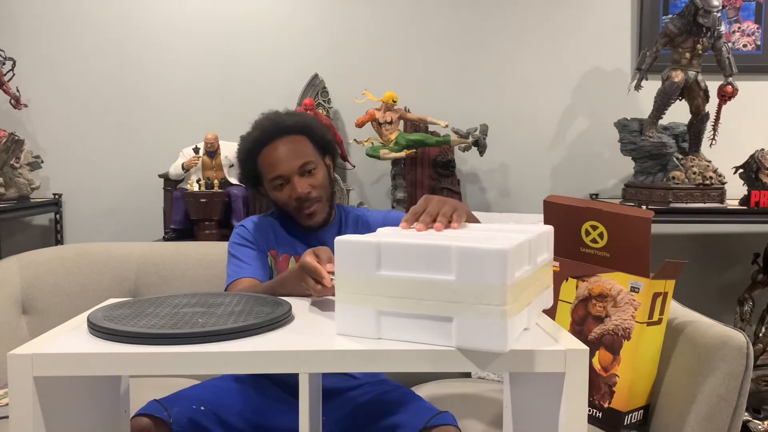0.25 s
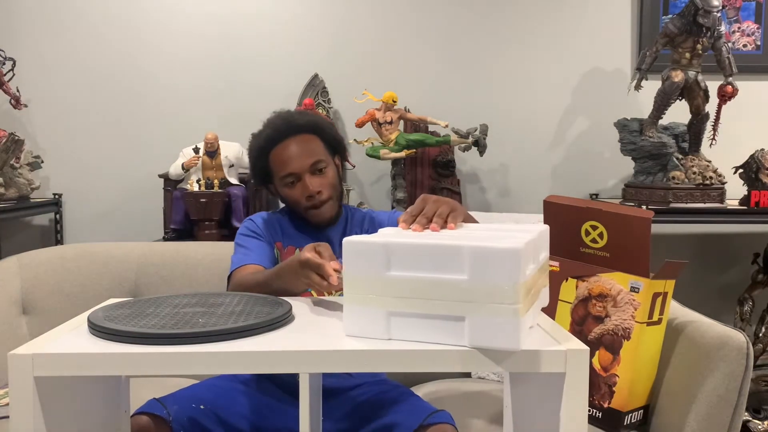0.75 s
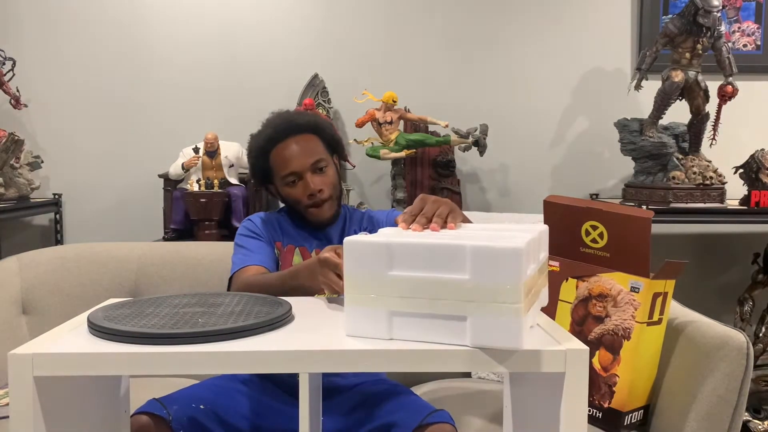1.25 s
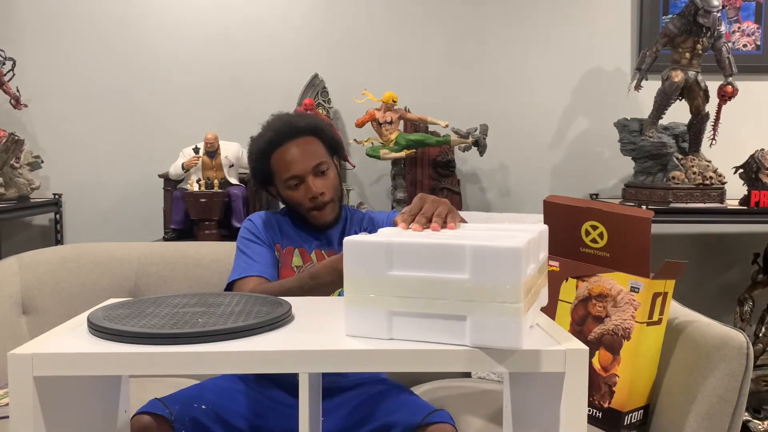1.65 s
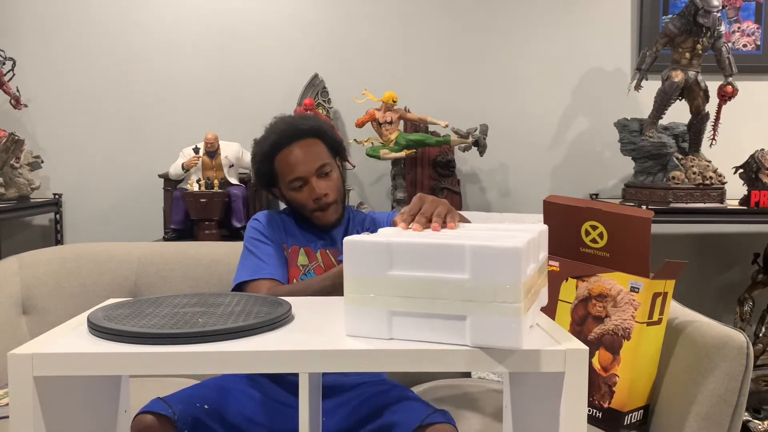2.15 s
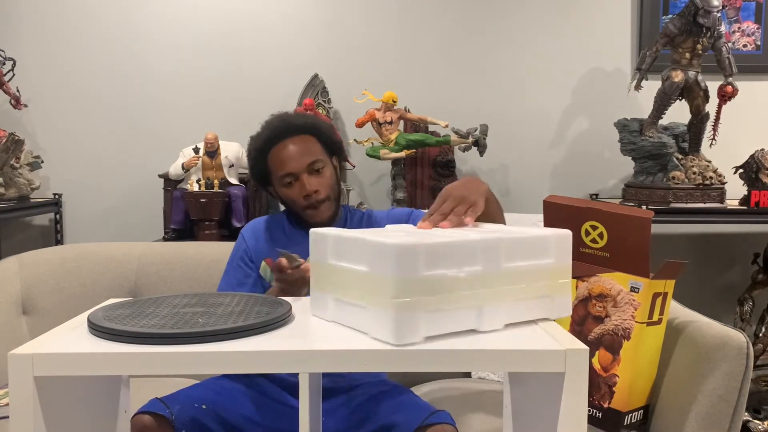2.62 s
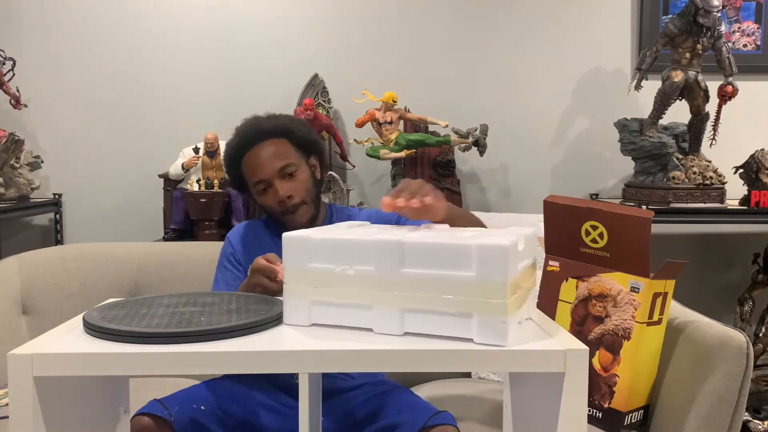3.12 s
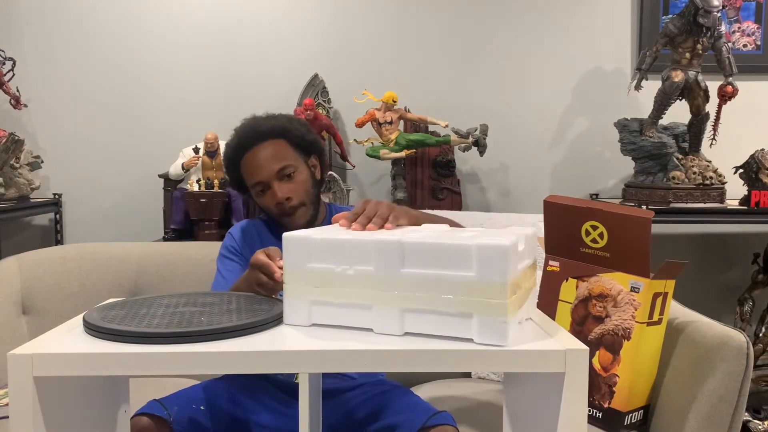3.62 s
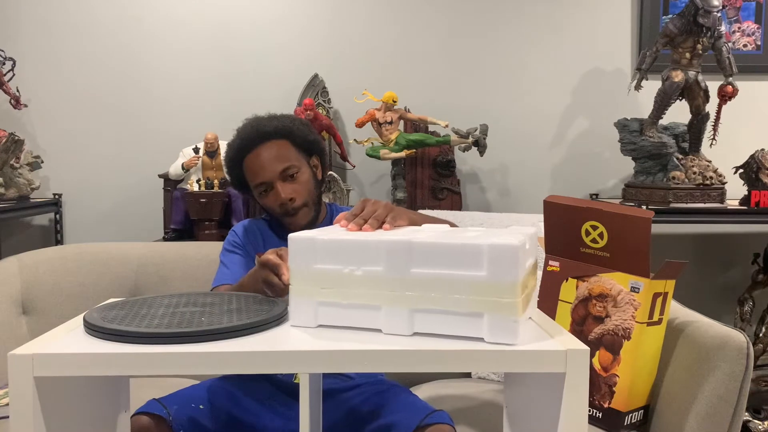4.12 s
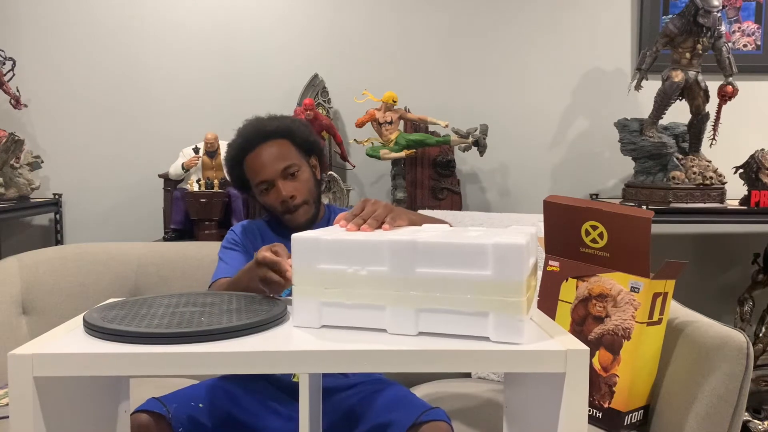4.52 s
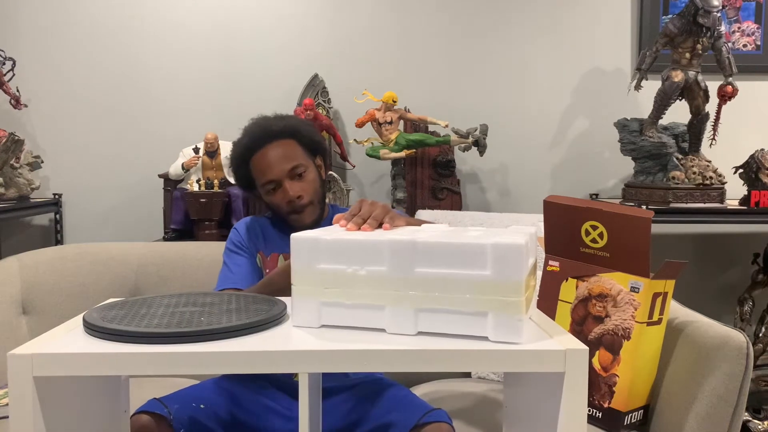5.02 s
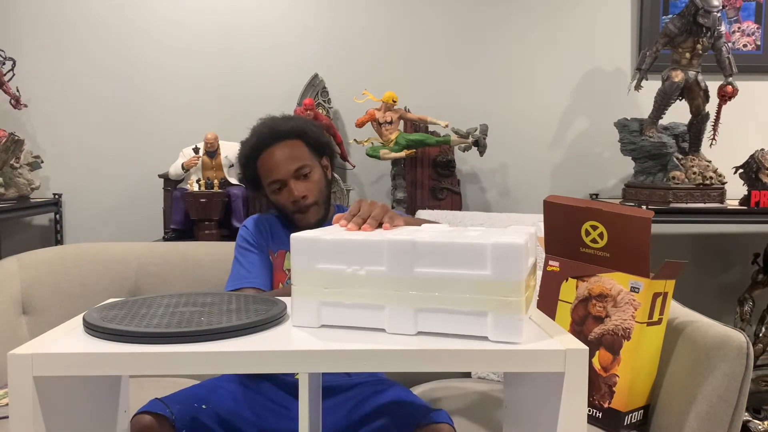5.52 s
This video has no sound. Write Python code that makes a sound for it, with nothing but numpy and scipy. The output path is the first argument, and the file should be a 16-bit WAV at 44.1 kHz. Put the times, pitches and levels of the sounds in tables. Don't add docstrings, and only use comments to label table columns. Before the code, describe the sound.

Close up in a small furnished room, a blade and hands work a polystyrene case's taped seam. Dry grainy rubbing, snaps and a short hard rip with a lid knock come first; the case is turned and drops on a hollow table, then a near pause. Faint tape creaks and ticks lead to a softer rip, then busy scraping and knocks that fade. Low ventilation rumble, phone microphone at arm's length.

```python
import sys
import numpy as np
from scipy import signal
from scipy.fft import rfft, irfft, next_fast_len
from scipy.io import wavfile
from scipy.ndimage import uniform_filter1d, minimum_filter1d

SR = 44100
rng = np.random.default_rng(int(sys.argv[2]) if len(sys.argv) > 2 else 0)


def undo_db(level):
    steps = np.asarray(level, float) / 20
    return 10 ** steps


def bounce(signal):
    frames = np.transpose(np.atleast_2d(signal))
    limited = np.clip(frames, -1, 1)
    pcm = np.round(limited * 32767).astype(np.int16)
    wavfile.write(sys.argv[1], SR, pcm)


N = 254310
HZ = np.fft.rfftfreq(next_fast_len(N + SR), 1 / SR)


def shape(x, response):
    size = 2 * len(HZ) - 2
    return irfft(rfft(x, size) * response, size)[..., :N]


def notch(lo_hz, hi_hz):
    return np.clip(np.maximum(lo_hz - HZ, HZ - hi_hz) / 150 + 1, 0, 1) ** 2


def ring(modes):
    f = HZ + 1e-6
    total = 0
    for k, (hz, width_hz, db) in enumerate(modes):
        total = total + (-1) ** k * undo_db(db) / (1 + 1j * (f / hz - hz / f) * hz / width_hz)
    return total / np.sqrt(np.mean(np.abs(total) ** 2))


def walk(rate):
    hold = int(SR / rate)
    steps = np.repeat(rng.standard_normal(N // hold + 1), hold)
    return 1.1 * uniform_filter1d(uniform_filter1d(steps, hold), hold)[:N]


def add(track, s, piece):
    i = int(s * SR)
    track[..., i:i + piece.shape[-1]] += piece[..., :N - i]


def impulses(events):
    track = np.zeros(N)
    for s, db in events:
        add(track, s, undo_db(np.array([db])))
    return track


def strokes(moves, rise_db_s, fall_db_s):
    t = np.arange(0, N, 32) / SR
    power = np.zeros((2, 1)) + undo_db(2 * -92.5)
    for s, hold_s, db, colour_db in moves:
        env_db = db - rise_db_s * np.maximum(s - t, 0) - fall_db_s * np.maximum(t - s - hold_s, 0)
        power = power + undo_db(2 * (env_db + np.array([[0], [colour_db]])))
    return np.repeat(np.sqrt(power), 32, axis=1)[:, :N]


def push(scrape_db, table_db, wall_db, hiss_db):
    return undo_db(np.array([[table_db + 27.0], [wall_db + 17.0], [scrape_db + 12.0], [hiss_db + 21.5]]))


def air():
    # (frequency [Hz], level per Hz [dB])
    rumble = [(18, -65.5), (30, -33.5), (42, -14), (59, 2.5), (81, 0), (98, -12), (153, -9), (215, -16.5),
              (280, -33), (311, -16), (1070, -65), (2610, -48), (16000, -92.5)]
    # (frequency [Hz], level [dB])
    hum = [(70.0, -63.5), (118.4, -61.5), (161.5, -83.5)]
    hz, db = np.transpose(rumble)
    spectrum = undo_db(np.interp(np.log(HZ + 1), np.log(hz), db))
    mid, side = shape(rng.standard_normal((2, N)), spectrum)
    side = shape(side, np.clip(HZ / 700, .2, 1))
    gusts = undo_db(-50.5 + 0.5 * walk(7.0))
    wind = gusts * (mid + side * np.array([[1], [-1]])) / mid.std()
    t = np.arange(N) / SR
    lines = sum(undo_db(db + 1.9 * walk(2.3)) * np.sin(2 * np.pi * f * t + 2.2 * walk(1.7)) for f, db in hum)
    return wind + lines


def room():
    # (frequency [Hz], time to fall 60 dB [s])
    decay = [(150, 0.26), (500, 0.35), (1500, 0.3), (4000, 0.38), (9000, 0.29), (15000, 0.22)]
    # (delay [ms], level [dB], scatter [ms])
    surfaces = [(2.6, -17, .4), (5.0, -11, .15), (11.5, -12, 1.2), (14, -14, 2)]
    t = np.arange(SR // 2) / SR
    f = np.fft.rfftfreq(len(t), 1 / SR)
    noise = rfft(rng.standard_normal((2, len(t))))
    noise = noise / (1 + (350 / (f + 1)) ** 2)
    alike = np.clip(350 / (f + 1), 0, 1)
    noise[1] = alike * noise[0] + np.sqrt(1 - alike ** 2) * noise[1]
    centres = np.log([hz for hz, _ in decay])
    tail = 0
    for k, (hz, t60) in enumerate(decay):
        share = np.interp(np.log(f + 1), centres, np.arange(len(decay)) == k)
        tail = tail + irfft(noise * share) * np.exp(-np.log(1000) * t / t60)
    tail = tail * np.clip(t / 0.0026, 0, 1)
    response = undo_db(-0.5) * tail / np.sqrt(np.sum(tail[0] ** 2))
    for (ms, db, scatter_ms), echo in zip(surfaces, rng.standard_normal((len(surfaces), 2, 256))):
        echo = (echo + 1.5 * echo[0]) * np.exp(-1000 * t[:256] / scatter_ms)
        echo = echo / np.sqrt(np.sum(echo ** 2, axis=1, keepdims=True))
        add(response, ms / 1000, undo_db(db) * echo)
    response = rfft(response, 2 * len(HZ) - 2)
    power = np.abs(response) ** 2
    return response * np.sqrt(uniform_filter1d(power, size=6000) / (uniform_filter1d(power, size=800) + 1e-9))


def bumps():
    # (time [s], level [dB])
    thuds = [
        (.025, -80),
        (1.73, -42),
        (2.305, -61),
        (2.696, -39),
        (2.774, -24.5),
        (2.984, -44),
        (3.214, -44),
        (3.69, -41),
        (4.327, -28),
    ]
    # (frequency [Hz], width [Hz], level [dB])
    top = [(151, 35, -13), (203, 43, -10.5)]
    return shape(impulses(thuds), undo_db(30.0) * ring(top) / (1 + 1j * HZ / 300) ** 2)


def raps():
    # (time [s], level [dB])
    hits = [(.0265, -55), (2.769, -37), (2.777, -47), (2.8, -45), (3.191, -63), (3.288, -47.5),
            (4.045, -44), (4.65, -26), (4.811, -22), (4.822, -26), (4.878, -22), (4.889, -21.5),
            (4.963, -26.5), (5.04, -36), (5.13, -31)]
    # (frequency [Hz], width [Hz], level [dB])
    side_wall = [(1280, 190, -3), (1560, 310, 2), (2000, 370, 0), (2650, 510, 0.5)]
    return shape(undo_db(16.5) * impulses(hits), ring(side_wall))


def knocks():
    # (time [s], level [dB])
    hits = [
        (0.808, -39),
        (1.078, -18),
        (1.089, -22),
        (1.123, -37),
        (4.014, -49),
        (4.043, -38),
        (4.342, -19),
        (4.675, -30),
        (4.69, -29),
    ]
    # (frequency [Hz], width [Hz], level [dB])
    lid = [(1031.5, 130, 7.5), (1250, 28, -8)]
    return shape(undo_db(18.5) * impulses(hits), ring(lid))


def threads():
    # (time [s], level [dB])
    ticks = [(3.1946, -57), (3.5964, -50), (3.607, -49.5), (3.6656, -54), (3.6998, -49), (3.73, -48.5),
             (3.781, -46), (3.7944, -61), (3.823, -60), (3.833, -51), (3.8786, -54.5), (3.9024, -58.5),
             (3.926, -50), (4.167, -42.5), (5.6905, -69)]
    # (frequency [Hz], width [Hz], level [dB])
    thread = [(1204, 1200, -16), (6320, 470, 3.5), (10700, 1140, -1.5), (14500, 2200, -6)]
    return shape(impulses(ticks), undo_db(23.5) * ring(thread))


def creak():
    # (frequency [Hz], width [Hz], level [dB])
    taut = [(6400, 650, 11), (12520, 3000, -10)]
    start_s, end_s, gap_s = 3.461, 3.59, .0115
    s = np.arange(start_s, end_s, gap_s)
    chance = rng.standard_normal((len(s), 2))
    ticks = zip(s + .001 * chance[:, 0], -61 + 2 * chance[:, 1])
    return shape(impulses(ticks), undo_db(21.0) * ring(taut))


def snaps(slip_db=-3.0, slip_ms=.45):
    # (time [s], level [dB], brightness [dB], share that rings the foam walls [dB])
    releases = [(0.4958, -45.5, 1.5, -17), (0.6022, -47, 1.5, 11), (0.8081, -30.5, 3, 5),
                (0.852, -30, 2.5, 6.5), (0.8811, -16.5, 1.5, -13.5), (1.0774, -35.5, 9.5, 9),
                (1.0899, -17, -28, -20), (1.1228, -18, -3.5, -24), (1.1331, -35, -11.5, 14.5),
                (1.1793, -15, -11.5, -10), (1.73, -21.5, 1, -7), (1.8113, -18.5, -0.9, -8),
                (2.3051, -59, -3.2, 6), (2.7674, -45, -4.5, -3), (2.7764, -39, -22, 8),
                (4.0127, -45, -14, 12), (4.0418, -32, -14, -3), (4.3277, -18, 5.5, -25),
                (4.3325, -38, 2.5, 12), (4.3447, -23, 10.5, -15), (4.4356, -41, 5, 5.5),
                (4.5246, -31.5, -6, -1.5), (4.647, -26.5, -3, 3), (4.809, -19.5, -7.5, -5.5),
                (4.821, -25, -9.5, -3), (4.8758, -15, -2.5, -8), (4.962, -20, -32, -9), (5.128, -33, -4, 4),
                (2.38, -40, -17, -14)]
    drive, t = np.zeros((4, N)), np.arange(256) / SR
    for s, db, bright_db, wall_db in releases:
        slip = rng.standard_normal(256) * np.exp(-1000 * t / slip_ms)
        slip = undo_db(slip_db) * slip / np.sqrt(np.sum(slip ** 2))
        slip[0] = 1
        add(drive, s, push(db, db - 41, db + wall_db, db + bright_db) * slip)
    return drive


def rips(rough_db=-0.5):
    # (time [s], level [dB], rise [ms], fall [ms])
    tears = [
        (0.8804, -4, 2.9, 2.2),
        (4.3279, -11, 7.2, 17.4),
    ]
    drive, ms = np.zeros((4, N)), 1000 * np.arange(N) / SR
    for s, db, rise_ms, fall_ms in tears:
        late = ms - 1000 * s
        gather = 0.2 * np.exp(np.minimum(late, 0) / rise_ms)
        die = np.exp(-np.maximum(late, 0) / fall_ms)
        envelope = np.where(late < 0, gather, die)
        rough = np.repeat(rng.standard_normal(N // 32 + 1), 32)[:N]
        crackle = rng.standard_normal((4, N)) * undo_db(rough_db * rough)
        bright = np.array([[1], [1], [1], [.3]]) ** (late < 0)
        force = push(db, db - 26.5, db - 11, db - 26)
        drive = drive + undo_db(-14.5) * force * bright * envelope * crackle
    return drive


def rub(scatter_db=4.0, flutter_db=1.99):
    # (start [s], hold [s], level [dB], brightness [dB])
    blade = [(0, 0.02, -68, -0.5), (.26, 0.23, -57, -16), (.44, 0.009, -48.5, 2), (.62, 0.023, -47.5, -9.5),
             (.85, 0.024, -38.5, -17), (.92, .02, -61, 3), (1.0, 0.089, -52, -21), (1.095, .02, -44.5, 2),
             (1.2, 0.51, -42.5, 0), (1.76, 0.071, -41.5, -6), (1.92, .07, -47.5, -4.5),
             (2.11, 0.013, -45.5, -1.5), (2.16, 0.011, -49, 18), (2.31, 0.42, -55, 7.5),
             (2.79, 0.0083, -46.5, -11), (3.18, .05, -64.5, 4.5), (3.27, 0.083, -57.5, -11),
             (3.51, 0.39, -64.5, -21), (3.6, 0.0092, -69.5, 8.5), (3.8, 0.009, -65, 7),
             (3.97, 0.071, -50, -3), (4.15, .04, -47.5, -4), (4.38, 0.017, -44, -5), (4.5, 0.15, -42.5, -6),
             (4.65, 0.056, -33, -2), (4.76, 0.34, -40, -4), (5.15, 0.17, -48.5, -3.5),
             (5.37, 0.24, -54.5, -5.5), (5.52, 0.058, -44.5, -1.5), (5.66, 0.1, -58.5, -3.5)]
    # (start [s], hold [s], level [dB], weight on the table [dB])
    hand = [(.035, 0.0067, -55.5, 5), (.1, 0.0086, -75, 15), (.17, 0.35, -56, -9), (.42, 0.048, -43.5, -28),
            (.5, 0.052, -48.5, -12), (.625, 0.012, -44.5, -6), (.83, 0.076, -53, -25),
            (.93, 0.034, -51, -18), (1.09, 0.016, -43, -5), (1.22, 0.63, -43.5, -14.5),
            (1.9, .08, -45, -20), (2.09, 0.14, -47, -4), (2.31, 0.22, -47, -6), (2.54, 0.28, -52.5, -3),
            (2.8, 0.0067, -56, 12), (3.19, 0.21, -60.5, -8), (3.5, 0.35, -55.5, -11),
            (3.91, 0.11, -52, -22), (4.03, 0.013, -44, -6), (4.13, 0.16, -53, -12),
            (4.38, 0.011, -37.5, -19), (4.59, 0.043, -40, -8.5), (4.67, 0.022, -32, -15.5),
            (4.78, 0.047, -43, -10), (4.9, 0.13, -42.5, -8), (5.12, 0.038, -40, -12),
            (5.24, 0.047, -50, -6.5), (5.33, 0.19, -56, -7), (5.6, 0.034, -52.5, -34),
            (5.75, 0.017, -52.5, -6)]
    scrape, hiss = strokes(blade, rise_db_s=380, fall_db_s=331)
    wall, table = strokes(hand, rise_db_s=295.5, fall_db_s=276.5)
    catch = np.minimum(rng.exponential(size=N // 16 + 1), 4)
    size_db = scatter_db * np.repeat(catch, 16)[:N] + flutter_db * walk(45)
    grains = rng.standard_normal((4, N)) * undo_db(size_db)
    t = np.arange(N) / SR
    lifted = (t > 2.86) & (t < 3.189)
    grains = grains / grains.std() * np.where(lifted, undo_db(-20.0), 1)
    parts = [table * undo_db(5.), wall, scrape, hiss * undo_db(6.0)]
    return np.array([g * part * undo_db(.5 * walk(20)) for g, part in zip(grains, parts)])


def scene():
    # (frequency [Hz], width [Hz], level [dB])
    table_modes = [(152, 69, -4), (184, 58, -0.5), (324, 170, -5.5)]
    wall_modes = [(468.5, 285, -2.5), (595, 131, 3.5), (988, 208, -1.5), (1387, 252, 2.5), (1473, 441, 0)]
    scrape_modes = [(2065, 2000, 16.5), (2548, 105, 6.5), (3000, 2950, 13), (5700, 14200, 6.5)]
    hiss_modes = [(5740, 6200, 3), (8110, 4500, 7), (11050, 1800, 8), (18400, 9400, 1)]
    bodies = [-ring(table_modes) / (1 + 1j * HZ / 500), ring(wall_modes), -ring(scrape_modes), -ring(hiss_modes)]
    steady = sum(map(shape, rub(), bodies))
    sudden = sum(map(shape, snaps() + rips(), bodies)) + knocks() + raps()
    small = threads() + creak() + bumps()
    port_lag_s = 6e-5
    direct = undo_db(-3.0) * np.array([np.exp(-2j * np.pi * HZ * port_lag_s), 1 + 0 * HZ])
    walls = room()
    heard = shape(steady, direct + undo_db(-4.5) * walls)
    heard = heard + shape(sudden, direct + walls)
    heard = heard + shape(small, direct + undo_db(-9) * walls)
    keep = np.exp(-1 / (.12 * SR))
    loud = signal.lfilter([1 - keep], [1, -keep], heard[0] ** 2)
    return heard + air() / np.sqrt(1 + loud / undo_db(-25.5) ** 2)


def flicker(v, lo_hz, hi_hz, share):
    off = np.repeat(rng.random(N // 2048 + 2) < share, 2048)[2048 - 382:][:N]
    return v - uniform_filter1d(1. * off, size=512) * shape(v, 1 - notch(lo_hz, hi_hz))


def attacks(x):
    power = shape(x, np.clip(HZ / 4000 - 1, 0, 1)) ** 2
    fast = uniform_filter1d(power, size=64)
    before = uniform_filter1d(power, size=768, origin=383)
    sudden = 1. * (fast > 9 * np.roll(before, 64))
    return uniform_filter1d(-minimum_filter1d(-sudden, size=640), size=128)


def holes(v, share=.03):
    spectrum = signal.stft(v, nperseg=1024)[2]
    bins, frames = spectrum.shape
    patch = rng.random((bins // 4 + 1, frames // 3 + 1)) > share
    patch[:12] = True
    mask = np.kron(patch, np.ones((4, 3)))[:bins, :frames]
    return signal.istft(spectrum * mask, nperseg=1024)[1][:N]


def roll_off(x):
    return signal.sosfilt(signal.butter(12, 16970, fs=SR, output="sos"), x)


def record(dry):
    share = .7 * np.clip((HZ - 6000) / 2500, 0, 1)
    turning = np.exp(-1j * np.pi * (HZ - 6600) / 3200)
    right = shape(dry[0], share * turning) + shape(dry[1], np.sqrt(1 - share ** 2))
    keep_mid, keep_side = notch(8860, 10430), notch(12300, 13880)
    top = notch(15720, SR)
    mid = shape(dry[0] + right, keep_mid * top * (1.15 - 0.32 * keep_side)) / 2
    side = shape(dry[0] - right, keep_side * top * (1.2 - .2 * keep_mid)) / 2
    mid = flicker(flicker(mid, 8450, 9200, .3), 10100, 10950, .35)
    side = flicker(flicker(side, 11650, 12500, .25), 13600, 14560, .45)
    sharp = attacks(dry[0])
    whole = .2 * notch(16800, SR) + .8 * top
    mid = holes(mid) * (1 - sharp) + sharp * shape(dry[0] + right, whole) / 2
    side = holes(side) * (1 - sharp) + sharp * shape(dry[0] - right, whole) / 2
    ceiling = .8
    limited = ceiling * np.tanh(np.array([mid + side, mid - side]) / ceiling)
    return roll_off(shape(limited, notch(16700, SR)))


dry = scene()
out = record(dry)
bounce(out)
```